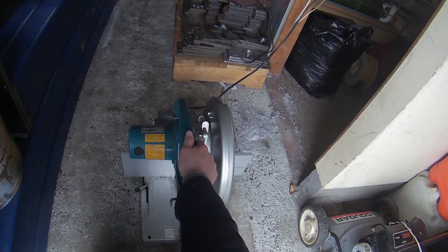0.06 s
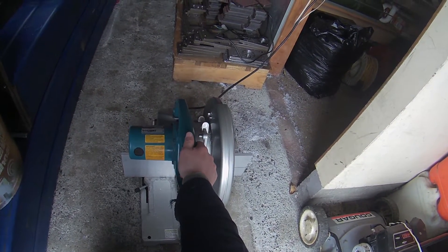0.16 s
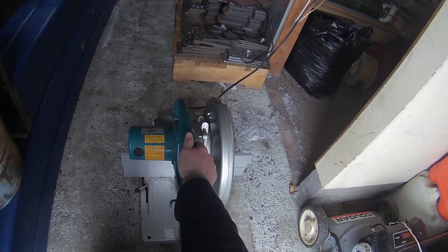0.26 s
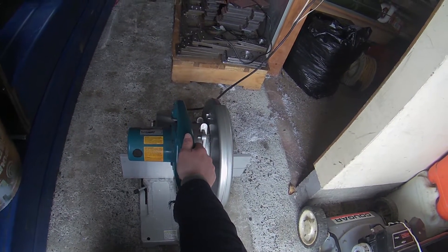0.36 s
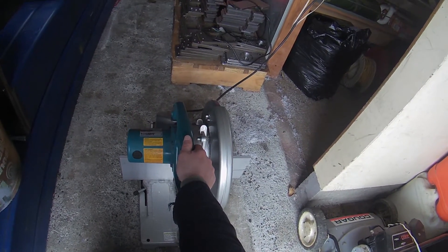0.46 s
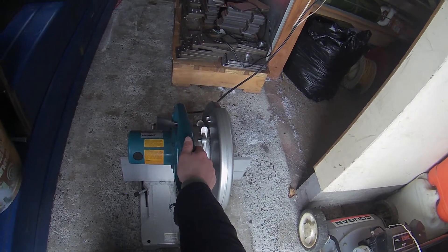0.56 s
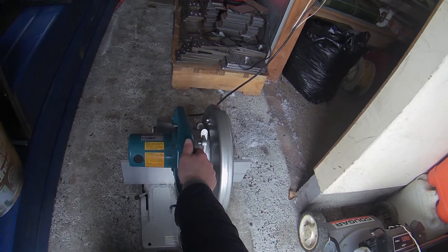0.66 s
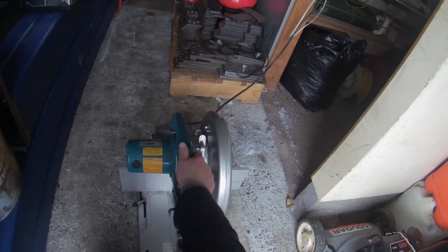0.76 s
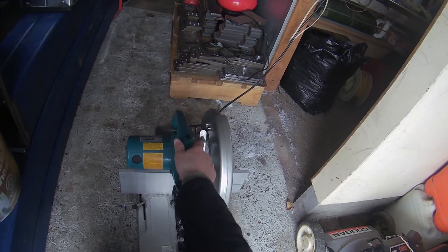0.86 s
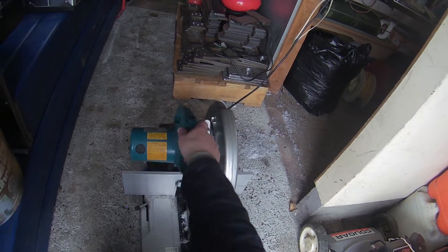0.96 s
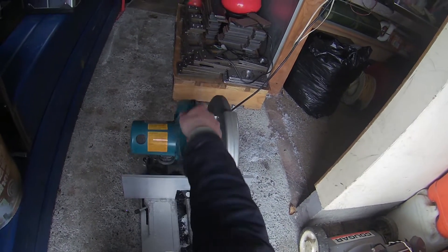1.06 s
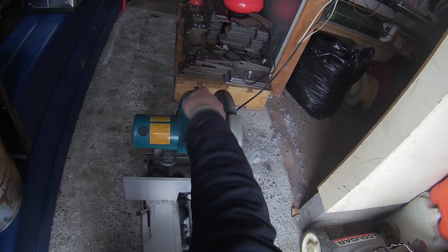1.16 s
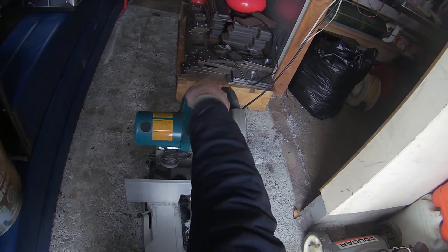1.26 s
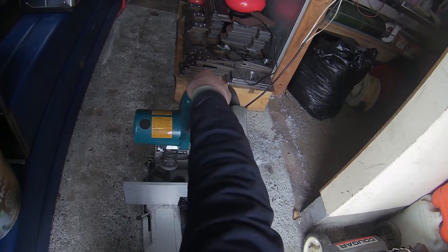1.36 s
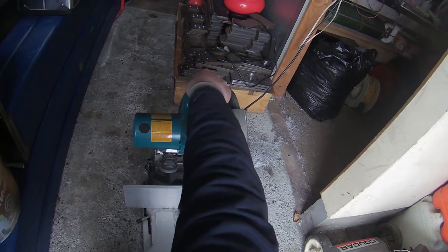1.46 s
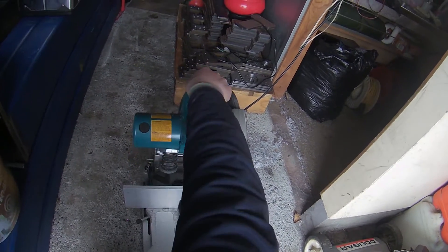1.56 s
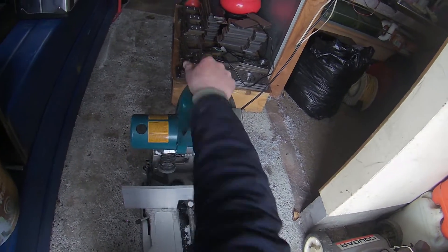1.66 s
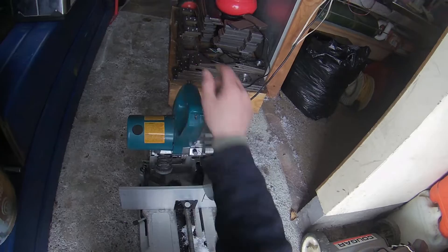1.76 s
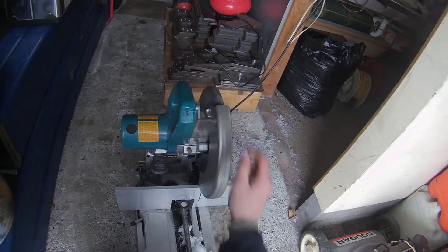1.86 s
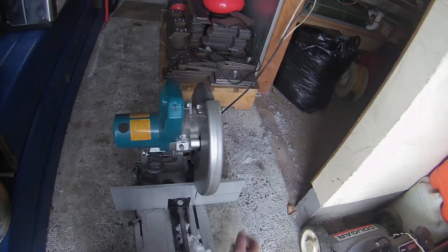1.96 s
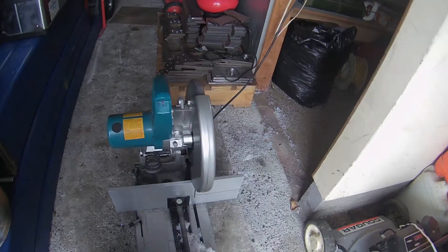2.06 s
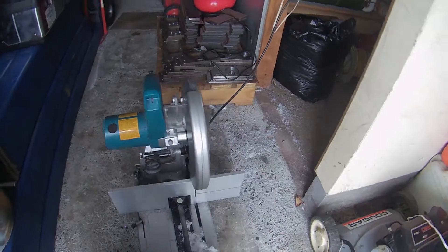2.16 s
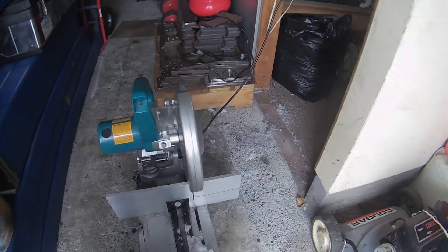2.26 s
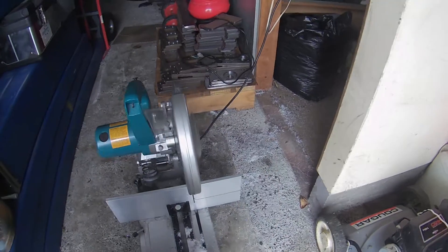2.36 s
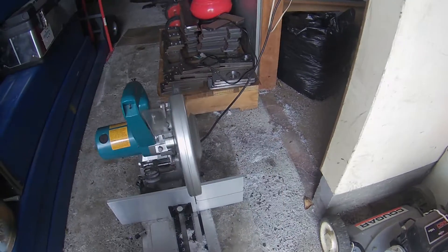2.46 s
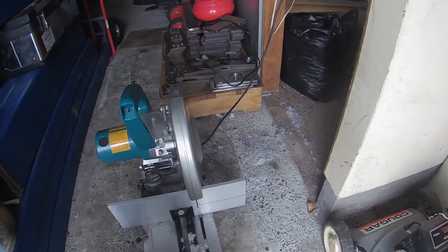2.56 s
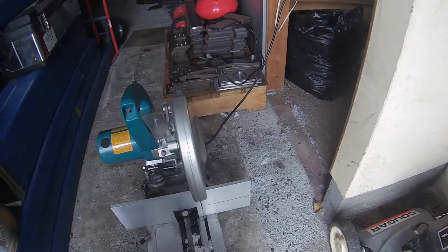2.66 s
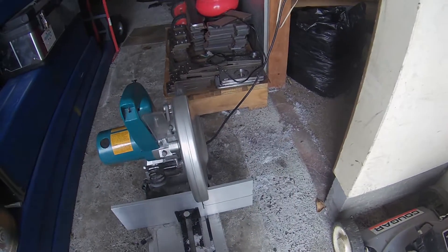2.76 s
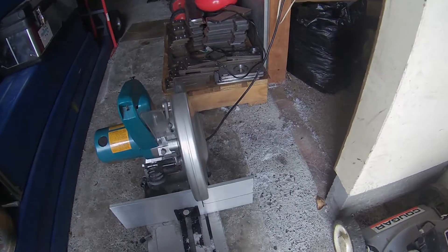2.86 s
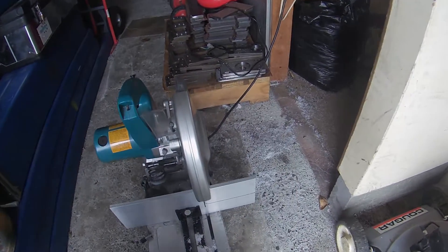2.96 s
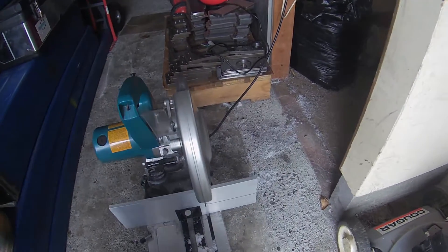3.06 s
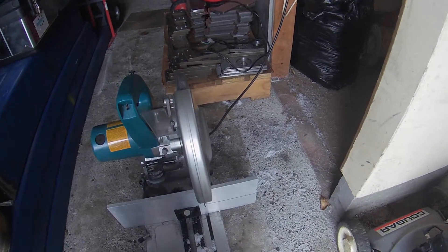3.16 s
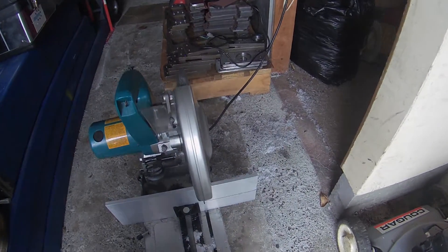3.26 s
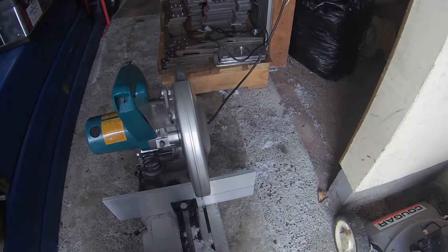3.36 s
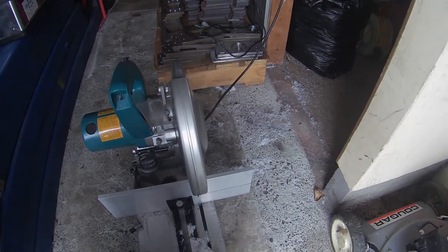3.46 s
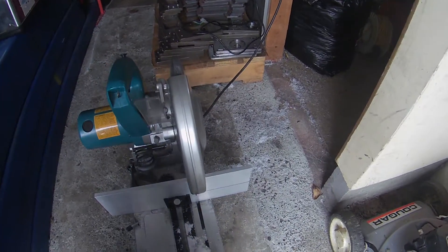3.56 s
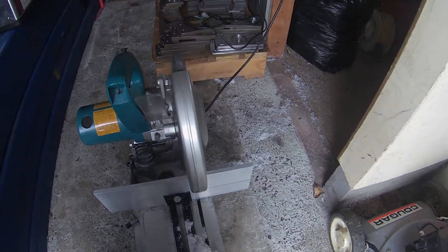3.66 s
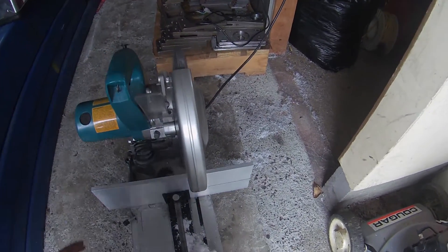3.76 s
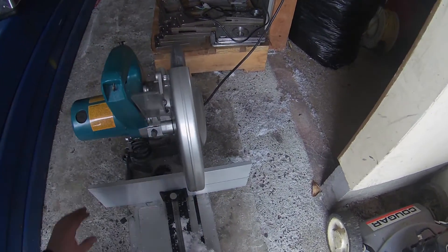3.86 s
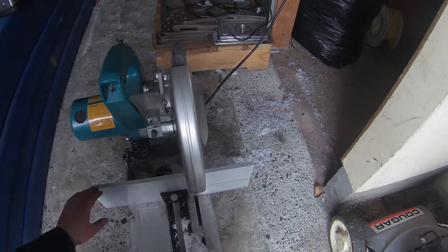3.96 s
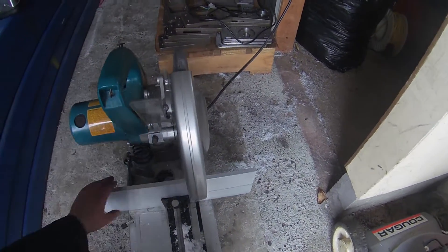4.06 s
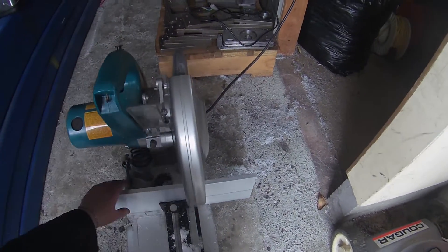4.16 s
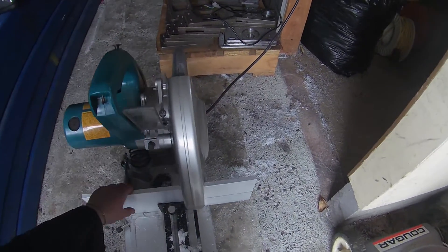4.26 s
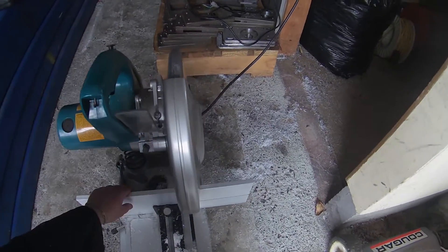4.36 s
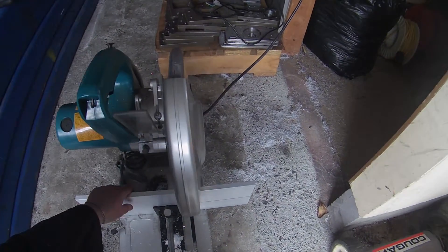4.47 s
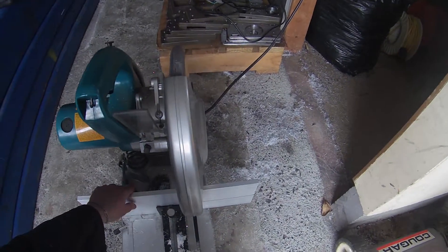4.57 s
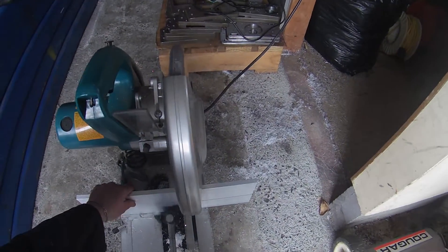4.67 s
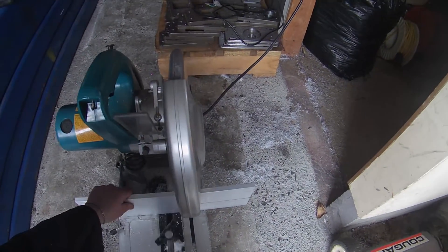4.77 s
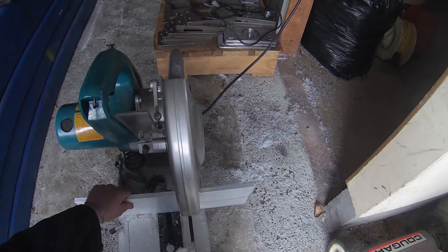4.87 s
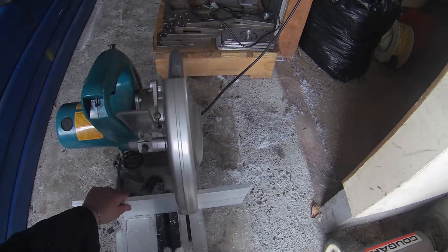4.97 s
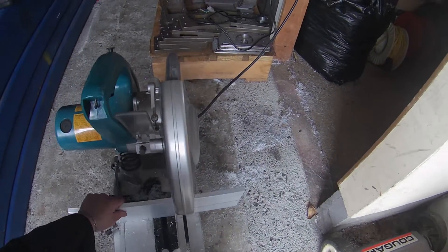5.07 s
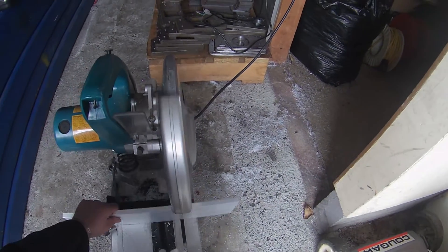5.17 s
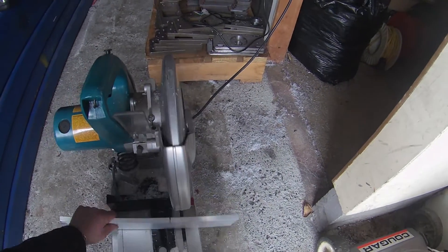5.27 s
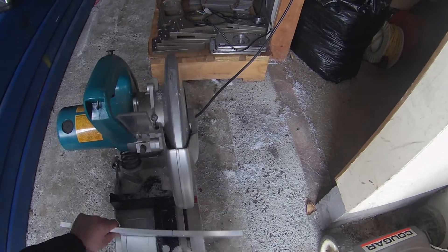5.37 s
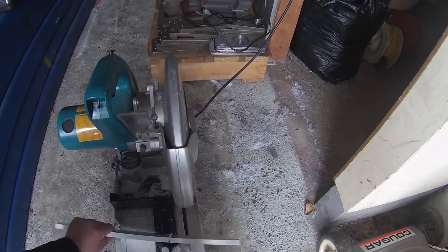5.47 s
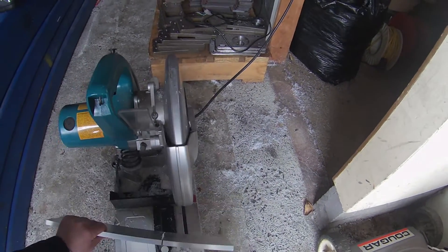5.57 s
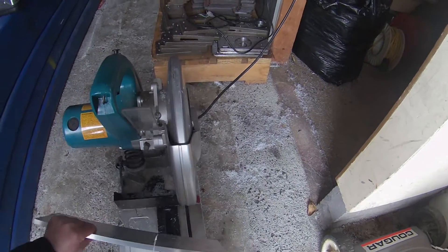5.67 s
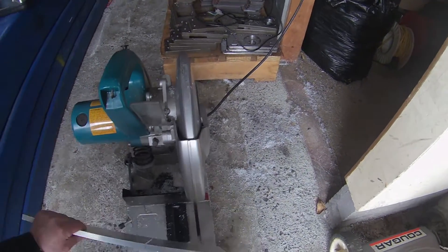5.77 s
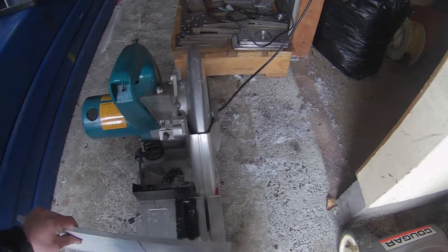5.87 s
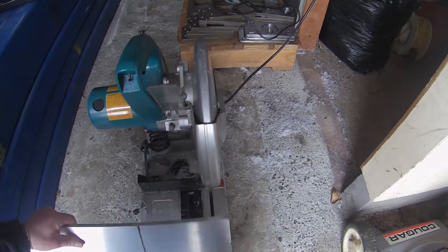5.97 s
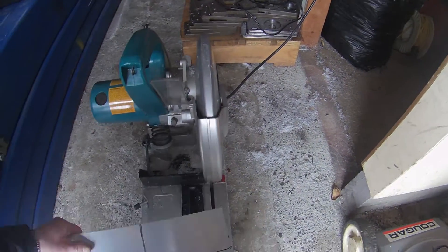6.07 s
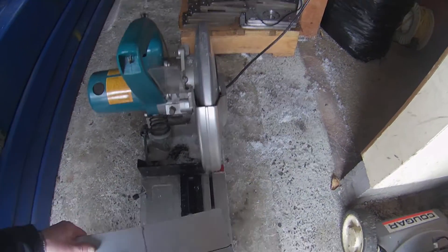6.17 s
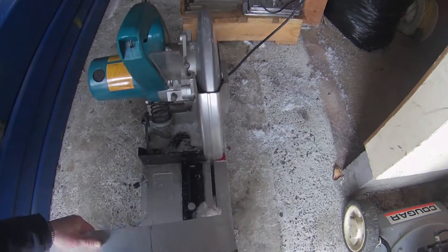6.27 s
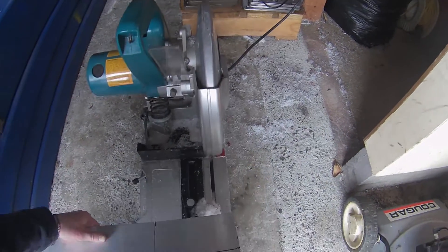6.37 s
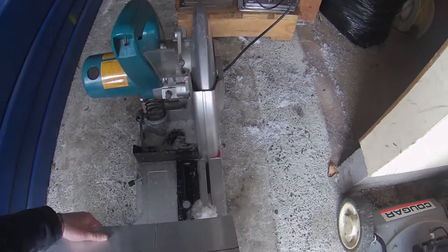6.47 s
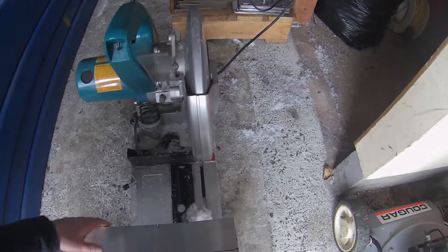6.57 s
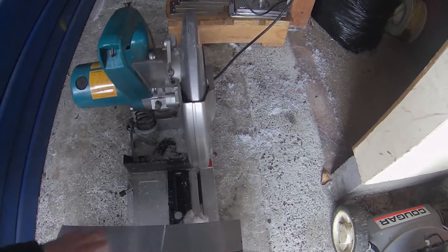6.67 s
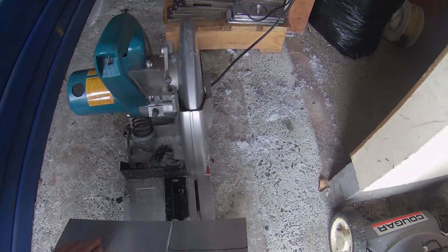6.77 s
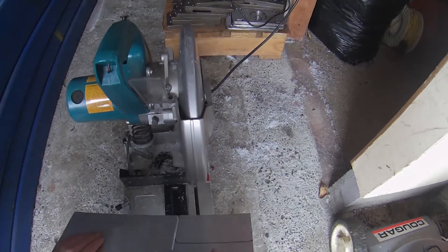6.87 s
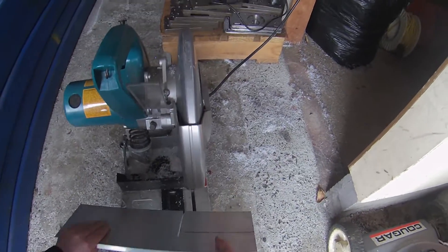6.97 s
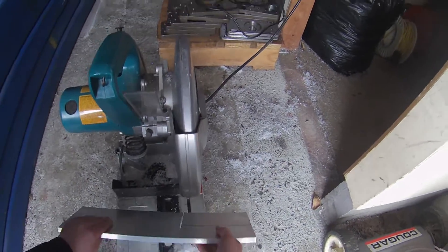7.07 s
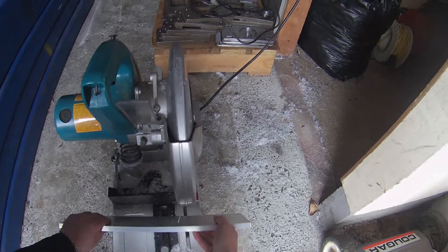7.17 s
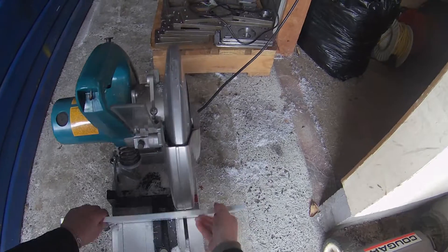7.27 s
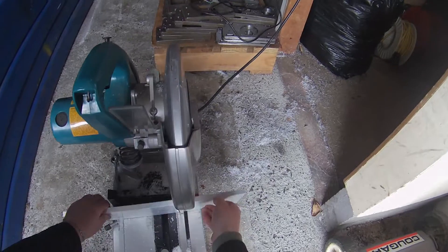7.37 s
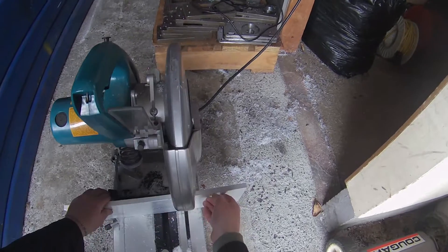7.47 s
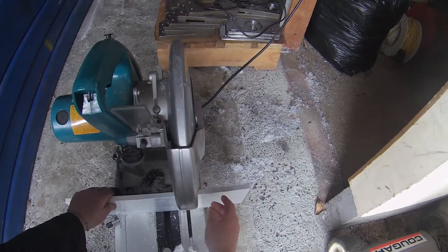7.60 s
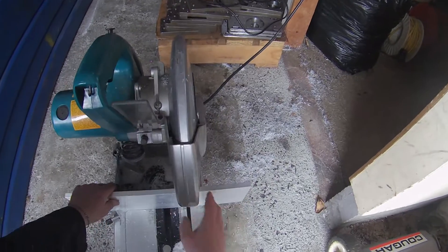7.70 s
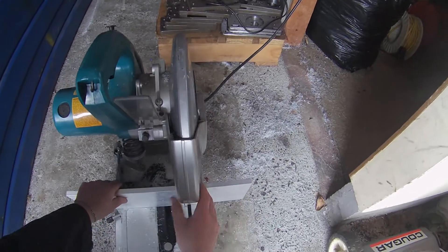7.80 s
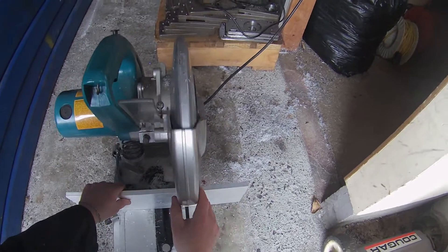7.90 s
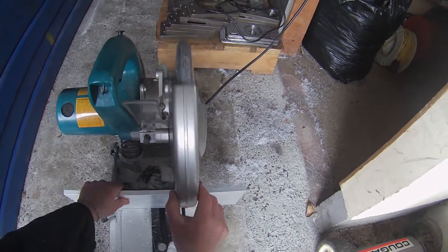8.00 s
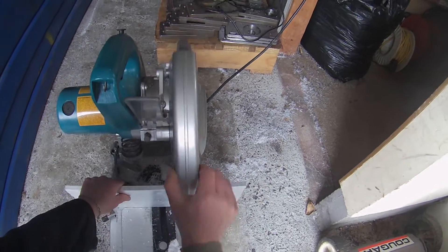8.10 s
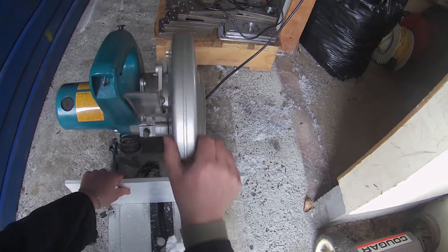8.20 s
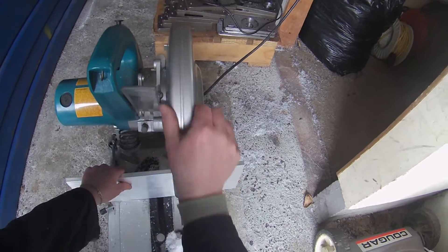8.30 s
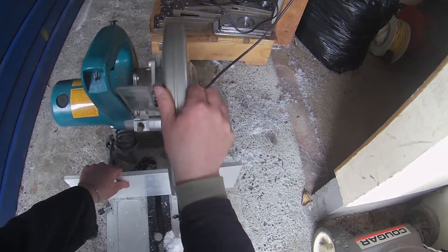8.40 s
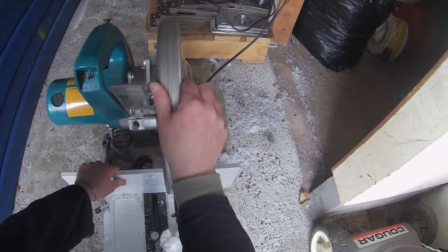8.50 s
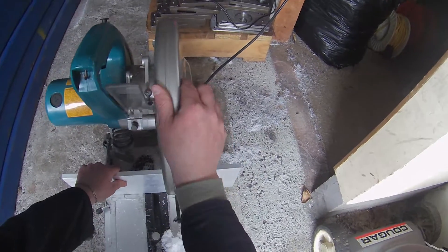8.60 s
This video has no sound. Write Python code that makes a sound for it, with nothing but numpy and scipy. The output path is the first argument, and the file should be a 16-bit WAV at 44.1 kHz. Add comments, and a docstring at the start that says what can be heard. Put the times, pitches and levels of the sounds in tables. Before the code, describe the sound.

Harsh close metal-cutting saw noise ends, the motor coasts down in a long falling whine, plate clatters, then small taps in a quiet garage.

```python
"""A chop saw finishing a cut in aluminium plate comes first, then it is switched off and coasts to rest.
Place: a garage with a short echo over a quiet floor. Distance: close. Microphone: one small one, worn on the head.
Teeth ring the blade, brushes hiss and whine over the commutator and gears rumble in the housing.
The plate is knocked, slid and set down, the guard is tapped and squeaks, and faint whistles pass.
The loud parts overload the microphone."""
import sys
import numpy as np
from scipy import signal
from scipy.fft import rfft, irfft
from scipy.io import wavfile
from scipy.ndimage import uniform_filter1d

SR = 44100
rng = np.random.default_rng(int(sys.argv[2]) if len(sys.argv) > 2 else 0)


def output_pcm(signal):
    """Save a mono or channel-first signal as 16-bit PCM at the path in sys.argv[1].

    Samples are clipped to [-1, 1] before scaling.
    """
    pcm = np.clip(np.atleast_2d(signal).T, -1, 1) * 32767
    wavfile.write(sys.argv[1], SR, np.round(pcm).astype(np.int16))


N = 381024
T = np.arange(N) / SR  # seconds

# Spectra list pitch_hz, level_db (per Hz, shape only: the sound is rescaled later).
# Modes list pitch_hz, width_hz (at -6 dB), level_db (on the spectrum's scale, before the body's modes_db).
# Rubbing lists start_s, level_db (treble), clank_db (re treble), drone_db (re treble).
# Blows list start_s, level_db (treble, before attack and decay), clank_db, thud_db (both re level),
# t60_s, pitch_hz (ringing tone), tone_db (re level); the tone's t60 is stretched by ring_on.

# quiet garage floor: pitch_hz, level_db
FLOOR_SPECTRUM = [(18, -27.5), (30, -8.5), (60, -19), (91, -18.5), (183, -24), (489, -27), (864, -34),
                  (1120, -38.5), (6480, -40), (12400, -43), (14400, -59.5)]
# faint whistles, perhaps birds outside, one list each: start_s, pitch_hz, level_db
WHISTLE_GLIDES = [
    [(6.95, 2190, -80.5), (7.0, 2200, -66), (7.05, 2200, -78)],
    [(7.02, 3080, -75), (7.06, 3070, -60.5), (7.11, 2660, -70), (7.15, 2270, -66), (7.2, 2310, -58)],
    [(7.47, 4100, -82), (7.52, 4260, -69), (7.57, 4000, -76), (7.62, 3580, -78)],
    [(7.55, 4530, -68), (7.63, 4520, -67.5), (7.75, 4520, -69)],
]
# squeaks of the guard's pivot: start_s, end_s, pitch_hz, level_db
PIVOT_SQUEAKS = [(7.838, 7.92, 4210, -55), (7.84, 7.907, 6600, -63), (7.868, 8.03, 5680, -49),
                 (7.854, 8.0, 1190, -41), (7.848, 8.057, 497, -38.5), (8.232, 8.31, 736, -43)]
# taps on the blade guard: start_s, level_db, clank_db, thud_db, t60_s, pitch_hz, tone_db
GUARD_TAPS = [(7.7505, -33.5, -3, -7, 0.073, 8200, 6), (7.8394, -46.5, -14, 12, 0.074, 503, 1),
              (7.92, -31.5, -16, -7, 0.12, 450, -5), (7.988, -28, -16, 4, 0.075, 503, -18),
              (8.2349, -45, 5.5, 16, 0.13, 483, 0), (8.358, -45, 1, 5.5, 0.35, 2850, -6),
              (8.4098, -31.5, 7.5, 6, 0.11, 3170, 5)]
# guard creeping round its pivot: start_s, level_db, clank_db, drone_db
GUARD_SWING = [(7.76, -48, -6, 1), (7.814, -68, -9, 11), (7.854, -48, -4, 10), (7.91, -50, -2, 12),
               (7.92, -37, -8, -6), (7.998, -33.5, -4.5, 5), (8.034, -64, -4, 11), (8.11, -61, -13, 1),
               (8.19, -60, -1, 12), (8.248, -54, -5, 1), (8.344, -62, -14, -1), (8.36, -49, 21, 10)]
# broad response of the guard: pitch_hz, level_db
GUARD_SPECTRUM = [(18, -66.5), (30, -43), (408, -10), (502, -5.5), (933, -10.5), (1180, -6.5), (1650, -15),
                  (3060, -28), (3870, -31.5), (8400, -26.5), (14400, -55)]
# resonances of the guard: pitch_hz, width_hz, level_db
GUARD_RESONANCES = [(480, 52, 4.5), (730, 39, 6.5), (856, 50, 3.5), (1207, 44.3, -3), (1544, 50, -2.5),
                    (1790, 60, -6.5), (2790, 60, -15), (3170, 50, -17), (4070, 80, -20.5), (5930, 90, -15),
                    (6560, 91, -21.5), (7450, 200, -17.5), (8100, 220, -19.5)]
# knocks of the plate: start_s, level_db, clank_db, thud_db, t60_s, pitch_hz, tone_db
PLATE_KNOCKS = [(4.2611, -3.5, -14, -9.5, 0.11, 5910, -7), (4.4844, -24, -16, 0, 0.13, 6750, -11),
                (4.5614, -19, 3, -19, 0.066, 830, -4), (4.578, -3.5, -18, -12.5, 0.13, 6150, -9),
                (4.7704, -10, -7, -17, 0.28, 8540, -3), (4.8574, -12, -10, -6, 0.088, 8100, -8),
                (5.215, -7.5, -11, -4, 0.18, 7650, -6.5), (5.232, -12, -26, -1, 0.13, 493, -7),
                (5.2694, -19, -23, -12, 0.26, 8350, -12), (5.3452, -11.5, -5.5, -10.5, 0.12, 3120, -5),
                (5.35, -28, 4, -3, 0.17, 2380, 5), (7.1976, -10, -6, 4, 0.11, 513, 1),
                (7.245, -12.5, -7, 2, 0.1, 1460, -10.5), (7.268, -15.5, -9, 2, 0.098, 8080, 4),
                (7.2944, -26.5, -6, 8.5, 0.31, 840, -0.5), (7.3302, -26.5, -6.5, 9.5, 0.17, 825, -15),
                (7.3983, -27, -11, 10.5, 0.1, 500, 10.5)]
# plate sliding on the table: start_s, level_db, clank_db, drone_db
PLATE_SLIDE = [(4.57, -32.5, 4, -2), (4.58, -26, -4, -16.5), (4.61, -9.5, -8, -10.5), (4.666, -7, -10, -14),
               (4.764, -15.5, -7, -8.5), (4.806, -11.5, -8.5, -10.5), (4.92, -46, 0, -14.5)]
# broad response of the plate: pitch_hz, level_db
PLATE_SPECTRUM = [(18, -36), (30, -27), (243, -17.5), (515, -8.5), (571, -8), (820, -6), (933, -10),
                  (1880, -8.5), (2190, -12.5), (8400, -2), (9310, -11), (13400, -21.5), (14400, -29)]
# resonances of the plate: pitch_hz, width_hz, level_db
PLATE_RESONANCES = [(506, 51, -10), (843, 45, 3.5), (1090, 28, -1.5), (1380, 220, -4), (1850, 32, -8.5),
                    (2490, 42, -6.5), (2640, 170, -7), (3300, 140, -3.5), (3410, 150, -9.5),
                    (3700, 37, -3.5), (3780, 15, 2), (5644, 150, 2), (6100, 110, 3.5), (7440, 230, 1),
                    (8440, 150, 3), (11200, 200, -32), (11200, 69, -19.5), (12200, 130, -14.5)]
# teeth in the metal: start_s, level_db, clank_db, drone_db
TEETH_CUT = [(0.0, -3.5, -13.5, -13), (0.028, -5.5, -11, -16.5), (0.532, -9, -7, -13.5),
             (0.82, -4.5, -10, -18), (1.05, -27, -1, -5.5)]
# guard and blade jolting as the head swings up: start_s, level_db, clank_db, thud_db, t60_s, pitch_hz, tone_db
HEAD_JOLTS = [(1.0775, -2, -4.5, -6, 0.24, 5730, -9), (1.2395, -5.5, -14, -13, 0.26, 4590, -7.5),
              (1.2988, -7, -5, -14, 0.29, 4510, -7.5), (1.4498, -7, -7, -24, 0.15, 6070, 0),
              (1.6294, -7, -11, -23, 0.2, 7160, -18), (1.6894, -9, -16, -14, 0.25, 7100, -0.5)]
# broad response of the blade: pitch_hz, level_db
BLADE_SPECTRUM = [(59, -48), (100, -26), (835, -16), (2520, -15), (4900, -6.5), (5210, -1.5), (6550, -3.5),
                  (7740, -1), (10100, -12.5), (13300, -17.5), (14400, -36)]
# resonances of the blade: pitch_hz, width_hz, level_db
BLADE_RESONANCES = [(3100, 29, -8), (3570, 34, -9), (4085, 89, -9), (4380, 41, -8), (4610, 75, -8),
                    (5210, 52, 0), (5200, 40, -5), (5760, 30, -1), (6920, 50, 5), (7130, 15, -1.5),
                    (7490, 63, 0.5), (7640, 60, 4.5), (8000, 110, -2), (8540, 170, -2), (9500, 97, -19.5),
                    (10400, 150, -15), (11800, 74, -19), (12200, 40, -20), (13200, 89, -13)]
# broad response of the motor housing: pitch_hz, level_db
HOUSING_SPECTRUM = [(18, -63), (30, -43.5), (277, -24), (464, -7), (586, -14), (864, -5.5), (958, -8.5),
                    (1830, -7.5), (2190, -10), (3400, -7.5), (3770, -0.5), (4180, -5.5), (7570, 5),
                    (13400, -20), (14400, -31)]
# resonances of the motor housing: pitch_hz, width_hz, level_db
HOUSING_RESONANCES = [(360.4, 60, -16), (482, 42, -10), (728, 73, -9.5), (832, 27, -7.5), (1146, 75, -8),
                      (1897, 73, -8.5), (2400, 50, -11), (3564, 77, -1.5), (4350, 97, -4), (4680, 160, -3),
                      (5886, 180, 1.5), (7460, 300, -2.5), (8200, 300, 1.5)]
# balance of the motor noise: start_s, rumble_db (re hiss), air_db (fan, re hiss)
NOISE_BALANCE = [(0.85, -15.5, -0.5), (0.95, -7, -10), (1.8, -7.5, -8.5), (2.9, -9, -8), (4.1, -8, -8.5),
                 (5.5, -6.5, -7.5), (6.4, -8, -11), (6.75, -7, -17), (7.0, 1, -22)]
# gear, fan and winding tones: multiple of shaft speed, level_db (re hiss, before muffling and the housing)
SHAFT_TONES = {12: -8, 28: -14.5, 36: -16, 40: -21.5, 41: -18, 45: -12.5, 49: -19.5, 53: -16.5, 60: -12.5,
               65: -16, 68: -19, 84: -29}
# commutator whine, harmonics 1, 2, 3 ..: level_db (re hiss, before muffling and radiation)
WHINE_HARMONICS_DB = [-1.5, -3.5, -9.5, -11, -13.5, -12, -14, -11, -13, -12, -14, -19, -13, -15.5]
# how well the housing radiates the whine: pitch_hz, level_db
WHINE_RADIATION = [(900, -29), (1400, -16), (1900, -14.5), (2200, -20), (2650, -9.5), (3200, -18),
                   (3450, -13), (3750, -3.5), (4000, -9.5), (4250, -5), (4600, -11.5), (4950, -5.5),
                   (5350, -9.5), (5900, 2), (6750, -10.5), (7200, 0.5), (8100, -4.5), (8800, -4),
                   (9700, -6.5), (10500, -12), (11800, -22.5), (13000, -18.5), (14000, -27.5)]

FLOOR_DB = -56.5
ROOM_T60_S, ROOM_DB = 0.22, -9
BARS = 32  # commutator bars per turn
SWITCH_OFF_S, STANDSTILL_S = 0.9, 6.988
CRAWL_S = 0.04  # the model holds the speed it has this long before standstill
FRICTION_BARS_PER_S2, DRAG_PER_BAR = 1309.9, 1.204e-5  # bearing friction; fan drag on speed squared
MUFFLED_DB, CLEAR_S = -20, 1.4  # motor tones are muffled at switch-off and clear as the head swings up
HISS_DB, HISS_DB_PER_OCTAVE, HISS_DIES_HZ = -14.5, 5, 250  # against bars per second
RING_OFF_DB_PER_S = 72  # the housing rings off once the rotor stands
JITTER_TURNS = 0.0007  # unsteady turning blurs the high overtones most
THROB, THROB_BELOW_HZ = 0.46, 950  # depth of the slow rotor's throb; turning point in bars per second
CEILING, KNEE, LOPSIDED = 0.4, 4.0, 0.055  # overload: amplitude, sharpness, square-law share
TOP_HZ = 14050


def amp(db):
    """Convert dB to gain."""
    return 10 ** (np.asarray(db) / 20)


def unit(x):
    """Scale to rms 1."""
    return x / np.sqrt(np.mean(x ** 2))


def band(x, lo_hz, hi_hz):
    """Band-pass between two pitches."""
    return signal.sosfilt(signal.butter(3, [lo_hz, hi_hz], "bandpass", fs=SR, output="sos"), x)


def sine(pitch_hz):
    """Sine whose phase accumulates a changing pitch."""
    return np.sin(2 * np.pi * np.cumsum(pitch_hz) / SR)


def decay(age_s, t60_s):
    """Exponential dying away by 60 dB in t60_s."""
    return np.exp(-np.log(1000) * age_s / t60_s)


def body(spectrum, modes=(), modes_db=0.0, size=8192):
    """Minimum-phase response of a broad spectrum with resonances on it."""
    hz = np.maximum(np.arange(size // 2 + 1) * SR / size, 1)
    pitch_hz, level_db = np.transpose(spectrum)
    power = amp(np.interp(np.log(hz), np.log(pitch_hz), level_db)) ** 2
    for mode_hz, width_hz, db in modes:
        power = power + amp(db + modes_db) ** 2 / (1 + (2 * (hz - mode_hz) / width_hz) ** 2) ** 2
    # folding the cepstrum forward makes the response start at once
    cepstrum = irfft(np.log(power) / 2)
    cepstrum[1:size // 2] *= 2
    cepstrum[size // 2 + 1:] = 0
    return irfft(np.exp(rfft(cepstrum)))


def ring(x, response):
    """Pass x through a response."""
    return signal.fftconvolve(x, response)[:N]


def walk(rate_hz):
    """Random levels held 1 / rate_hz seconds and smoothed twice; spread near 1."""
    k = int(SR / rate_hz)
    steps = np.repeat(rng.standard_normal(N // k + 1), k)
    return 1.38 * uniform_filter1d(uniform_filter1d(steps, k), k)[:N]


def grains(spread_db):
    """Dense contacts of very uneven size."""
    return rng.standard_normal(N) * amp(spread_db * rng.exponential(size=N))


def curve(rows):
    """Columns of a table over time; the first, a level, is -140 dB outside the table."""
    start_s, level_db, *others = np.transpose(rows)
    level = np.interp(T, start_s, level_db, left=-140, right=-140)
    return [level] + [np.interp(T, start_s, column) for column in others]


def rubbing(rows, jerk_db, rate_hz):
    """Envelopes (treble, clank, drone) of a sliding contact that comes in uneven jerks."""
    level_db, clank_db, drone_db = curve(rows)
    return amp(level_db + jerk_db * walk(rate_hz)) * amp([0 * T, clank_db, drone_db])


def blows(events, attack_s, ring_on):
    """Envelopes of rattling bursts (treble, clank, thud) and the tone each struck spot leaves ringing."""
    power, tones = np.zeros((3, N)), np.zeros(N)
    for start_s, level_db, clank_db, thud_db, t60_s, pitch_hz, tone_db in events:
        span = slice(int(start_s * SR), int((start_s + 0.6) * SR))
        age_s = T[span] - T[span][0]
        rise = 1 - np.exp(-age_s / attack_s)
        levels = amp([[level_db], [level_db + clank_db], [level_db + thud_db]])
        power[:, span] += (levels * rise * decay(age_s, t60_s)) ** 2
        tone = np.sin(2 * np.pi * pitch_hz * age_s)
        tones[span] += amp(level_db + tone_db) * rise * decay(age_s, ring_on * t60_s) * tone
    return np.sqrt(power), tones * amp(3.6 * walk(60))


def struck(envelopes, response, spread_db):
    """Grainy contacts ring a body in three bands, each with its own envelope."""
    out = 0
    bands_hz = ((4500, 16000), (2000, 4500), (25, 2000))  # treble, clank, thud or drone
    for envelope, (lo_hz, hi_hz) in zip(envelopes, bands_hz):
        force = grains(spread_db)
        steady = band(ring(force, response), lo_hz, hi_hz)
        shaped = band(ring(force * envelope, response), lo_hz, hi_hz)
        out = out + shaped / np.sqrt(np.mean(steady ** 2))
    return out


def quiet_floor():
    """Unsteady noise of the quiet garage, shaped by its spectrum."""
    noise = unit(ring(rng.standard_normal(N), body(FLOOR_SPECTRUM)))
    return amp(FLOOR_DB + 1.6 * walk(14)) * noise


def garage_echo(near):
    """Decaying noise smears the close sounds, starting 6 ms after them."""
    age_s = T[:SR // 2]
    echo = rng.standard_normal(len(age_s)) * decay(age_s, ROOM_T60_S) * (age_s > 0.006)
    return ring(near, amp(ROOM_DB) * echo / np.sqrt(np.sum(echo ** 2)))


def whistles():
    """Thin sines glide in pitch and level."""
    out = 0
    for rows in WHISTLE_GLIDES:
        start_s, pitch_hz, level_db = np.transpose(rows)
        level = amp(curve(np.c_[start_s, level_db])[0])
        out = out + level * sine(np.interp(T, start_s, pitch_hz))
    return out


def squeaks():
    """Rough, wavering tones while the pivot sticks and slips."""
    out = 0
    for start_s, end_s, pitch_hz, level_db in PIVOT_SQUEAKS:
        gate = uniform_filter1d(1.0 * ((T > start_s) & (T < end_s)), size=400)
        rough = amp(level_db + 3.8 * walk(70))
        out = out + gate * rough * sine(pitch_hz * (1 + 0.0073 * walk(50)))
    return out


def guard():
    """A hand taps the blade guard and swings it, ringing its resonances."""
    taps, tones = blows(GUARD_TAPS, attack_s=0.0012, ring_on=1.0)
    contact = np.hypot(rubbing(GUARD_SWING, jerk_db=4.0, rate_hz=46), taps)
    response = body(GUARD_SPECTRUM, GUARD_RESONANCES, modes_db=-3.0)
    return tones + struck(contact, response, spread_db=2.0)


def plate():
    """Knocks and a slide ring the aluminium plate."""
    knocks, tones = blows(PLATE_KNOCKS, attack_s=0.002, ring_on=1.3)
    contact = np.hypot(rubbing(PLATE_SLIDE, jerk_db=3.5, rate_hz=110), knocks)
    response = body(PLATE_SPECTRUM, PLATE_RESONANCES, modes_db=-1.0)
    return tones + struck(contact, response, spread_db=2.5)


def blade():
    """Teeth tear chips and ring the blade; later the rising saw head jolts it."""
    jolts, tones = blows(HEAD_JOLTS, attack_s=0.014, ring_on=0.88)
    contact = np.hypot(rubbing(TEETH_CUT, jerk_db=2.3, rate_hz=49), jolts)
    response = body(BLADE_SPECTRUM, BLADE_RESONANCES, modes_db=5.0)
    return tones + struck(contact, response, spread_db=3.0)


def bars_per_second():
    """Commutator speed v: steady under power, then dv/dt = -(friction + drag v^2) down to a crawl."""
    left_s = np.clip(STANDSTILL_S - np.maximum(T, SWITCH_OFF_S), CRAWL_S, None)
    scale = np.sqrt(FRICTION_BARS_PER_S2 / DRAG_PER_BAR)
    return scale * np.tan(np.sqrt(FRICTION_BARS_PER_S2 * DRAG_PER_BAR) * left_s)


def motor_noise(hiss_db, bars_hz, turns, housing):
    """Brush hiss, gear rumble and fan air are bands of one noise rung by the housing."""
    start_s, rumble_db, air_db = np.transpose(NOISE_BALANCE)
    rumble_db, air_db = np.interp(T, start_s, rumble_db), np.interp(T, start_s, air_db)
    once_a_turn = np.cos(2 * np.pi * turns)
    # the rotor is slightly out of round: the noise swells once a turn
    noise = ring((1 + 0.19 * once_a_turn) * grains(spread_db=2.0), housing)
    hiss = unit(band(noise, 2570, 9970)) * amp(0.97 * walk(30) + 0.56 * walk(6))
    rumble = unit(band(noise, 65, 2740)) * amp(rumble_db + 0.6 * walk(10))
    # the rumble throbs more as the rotor slows
    rumble = rumble * (1 + THROB / (1 + (bars_hz / THROB_BELOW_HZ) ** 2) * once_a_turn)
    air = unit(band(noise, 8910, 16000)) * amp(air_db + 1.2 * walk(24) + 2.0 * walk(7.8))
    return amp(hiss_db) * (hiss + rumble + air)


def motor_tones(hiss_db, bars_hz, turns, housing):
    """After switch-off, multiples of shaft speed sweep down through the housing's resonances."""
    def tone(multiple, level_db, flutter_db):
        """A multiple of shaft speed that swells and fades as brushes and gears chatter."""
        heard = (multiple * bars_hz / BARS < TOP_HZ) & (T > SWITCH_OFF_S)
        flutter = flutter_db * (walk(16) + 1.65 * walk(55))
        return heard * np.sqrt(2) * amp(level_db + flutter) * np.sin(2 * np.pi * multiple * turns)

    tones_db = hiss_db + np.interp(T, [SWITCH_OFF_S, CLEAR_S], [MUFFLED_DB, 0])
    weak = sum(tone(multiple, tones_db + db, 2) for multiple, db in SHAFT_TONES.items())
    weak = ring(weak, housing / np.abs(rfft(housing)).max())
    pitch_hz, radiated_db = np.transpose(WHINE_RADIATION)
    whine = 0
    for k, db in enumerate(WHINE_HARMONICS_DB, start=1):
        radiated = np.interp(np.log(k * bars_hz), np.log(pitch_hz), radiated_db)
        whine = whine + tone(k * BARS, tones_db + db + radiated, flutter_db=1.5 if k < 3 else 2)
    # the unbalance hum is hardly radiated when slow
    hum = band(tone(0.97, tones_db - 39, flutter_db=2.4), 130, 230)
    return weak + whine + hum


def motor():
    """Noise and tones share the coasting rotor's speed and die away with it."""
    bars_hz = bars_per_second()
    hiss_db = HISS_DB + HISS_DB_PER_OCTAVE * np.log2(bars_hz / bars_hz[0])
    hiss_db = hiss_db - 20 * np.log10(1 + HISS_DIES_HZ / bars_hz)
    hiss_db = hiss_db - RING_OFF_DB_PER_S * np.maximum(T - STANDSTILL_S + CRAWL_S, 0)
    turns = np.cumsum(bars_hz / BARS) / SR + JITTER_TURNS * walk(70)
    housing = body(HOUSING_SPECTRUM, HOUSING_RESONANCES, modes_db=4.5)
    noise = motor_noise(hiss_db, bars_hz, turns, housing)
    return noise + motor_tones(hiss_db, bars_hz, turns, housing)


def scene():
    """Floor and whistles behind the close saw and plate with their echo; one microphone feeds both channels."""
    background = quiet_floor() + whistles()
    near = squeaks() + guard() + plate() + blade() + motor()
    return np.tile(background + garage_echo(near) + near, (2, 1))


def record(dry):
    """The input stage flattens loud peaks lopsidedly, which adds a rumble; a steep filter cuts the top."""
    clipped = dry / (1 + np.abs(dry / CEILING) ** KNEE) ** (1 / KNEE)
    clipped = clipped + LOPSIDED * clipped ** 2
    clipped = signal.sosfilt(signal.butter(1, 12, "highpass", fs=SR, output="sos"), clipped)
    return signal.sosfilt(signal.ellip(12, 0.2, 90, TOP_HZ, fs=SR, output="sos"), clipped)


dry = scene()
out = record(dry)
output_pcm(out)
```